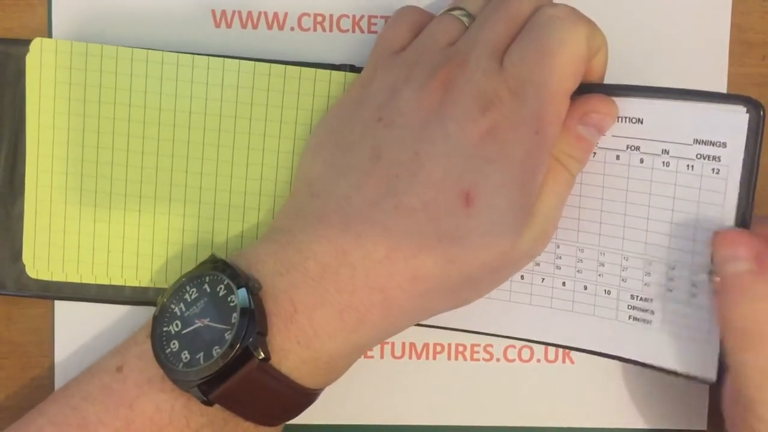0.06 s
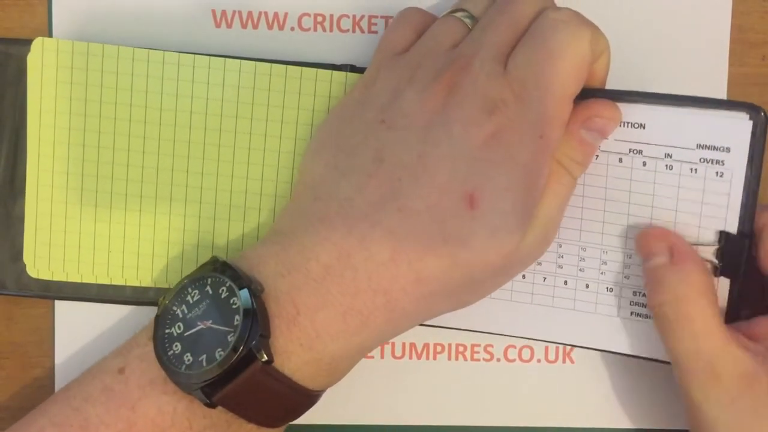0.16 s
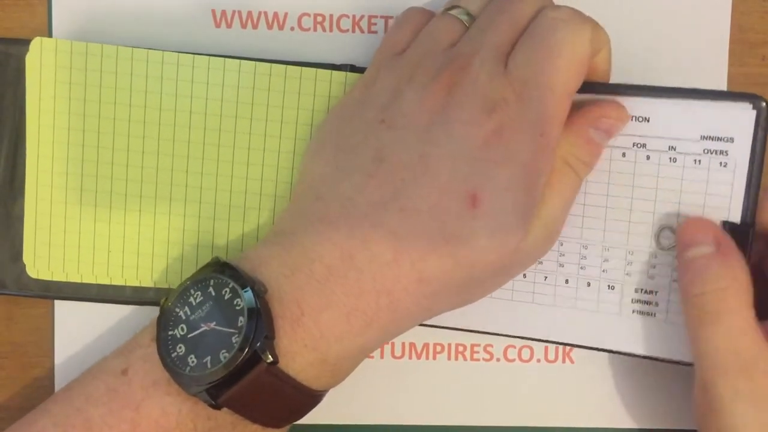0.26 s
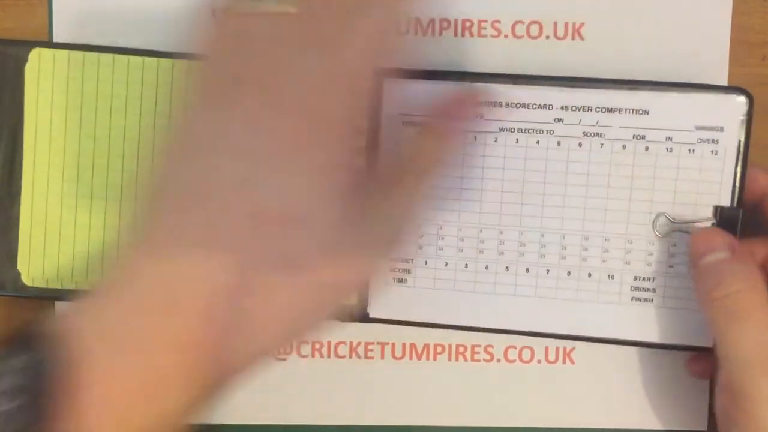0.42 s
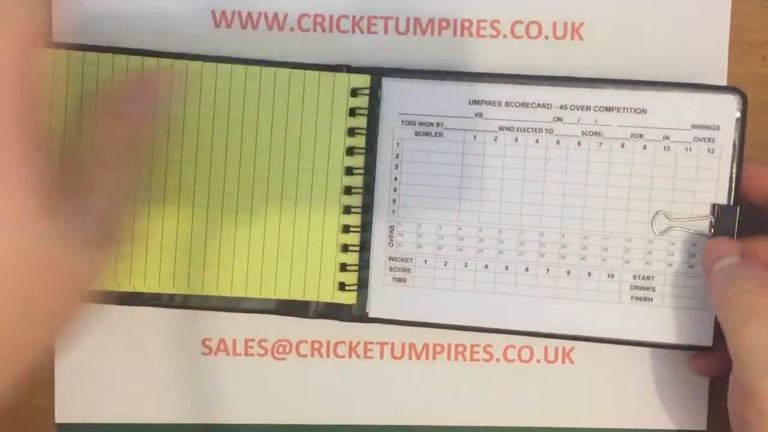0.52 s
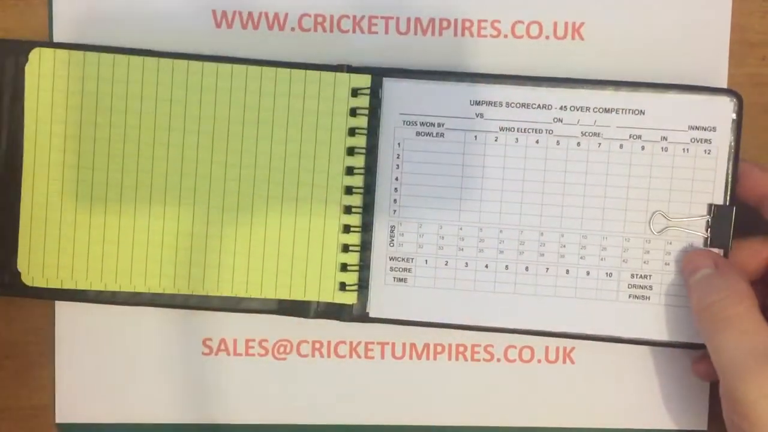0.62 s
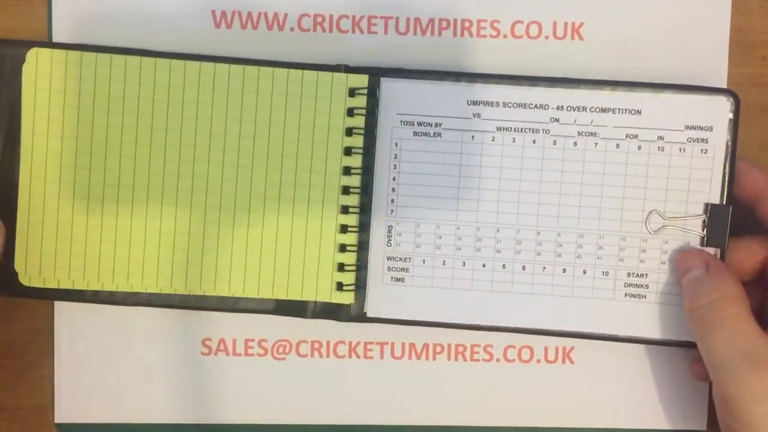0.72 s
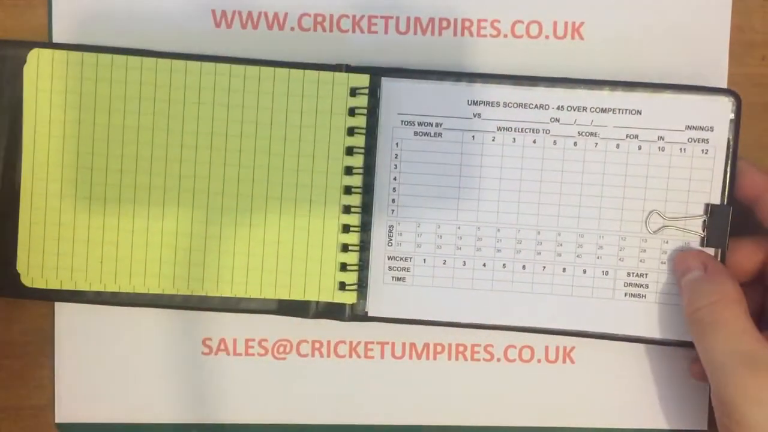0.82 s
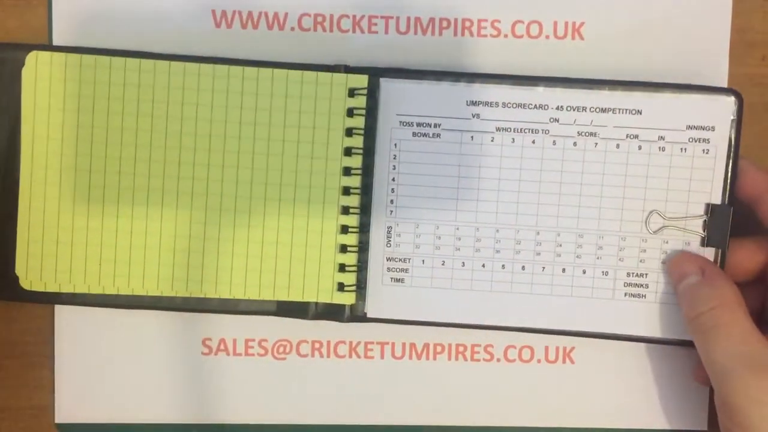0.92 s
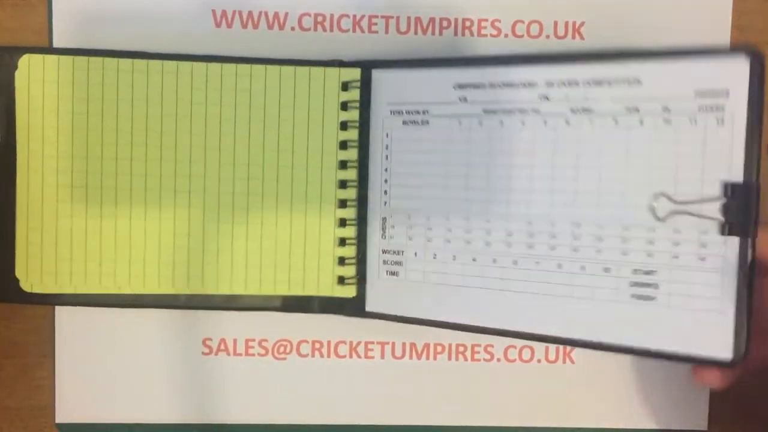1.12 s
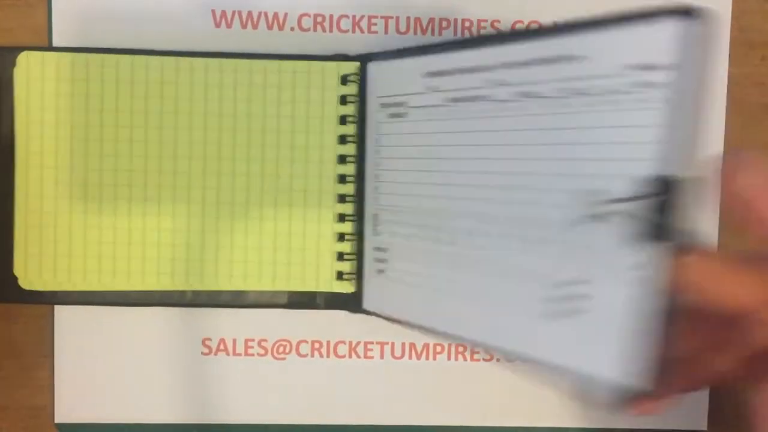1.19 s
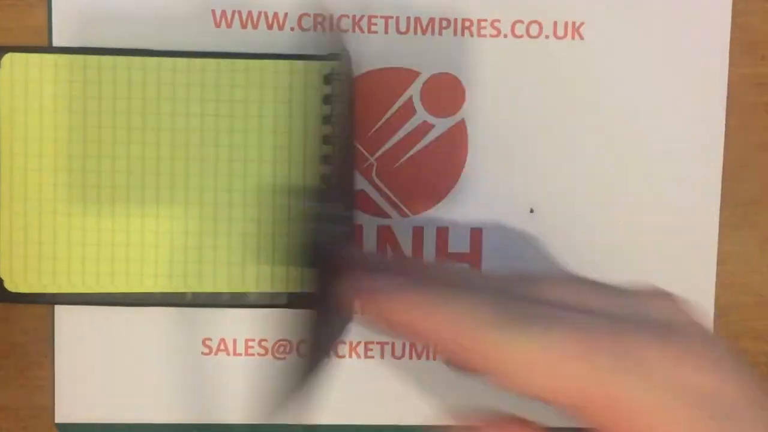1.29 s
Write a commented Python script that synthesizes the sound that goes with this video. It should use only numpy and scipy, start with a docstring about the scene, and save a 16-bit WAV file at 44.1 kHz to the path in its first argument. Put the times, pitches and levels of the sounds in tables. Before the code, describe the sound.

A small steel binder clip snaps shut sharply on a notebook cover, then faint handling taps

```python
"""A small room, the microphone close to a notebook: a small steel binder clip skids and snaps shut on its cover.
The steel jaws and the board ring as decaying sines with a crack of noise; the wire handles buzz and tick.
Taps add short notes and noise, the cover bumps on the table in low swings, and hands and pages rustle
as shaped noise and grains. Room air and a faint, wavering hum lie under it all."""
import sys
import numpy as np
from scipy import signal
from scipy.fft import rfft, irfft
from scipy.io import wavfile

SR = 44100
rng = np.random.default_rng(int(sys.argv[2]) if len(sys.argv) > 2 else 0)


def unload_wav(signal):
    """Save mono or channel-first audio to the path in sys.argv[1] as 16-bit WAV at rate SR, clipped to [-1, 1]."""
    wavfile.write(
        sys.argv[1],
        SR,
        np.round(np.clip(np.atleast_2d(signal).T, -1, 1) * 32767).astype(np.int16),
    )


N = 59535
TOP_HZ = 15700  # upper limit of the room tail and of the microphone

# jaws closing on the cover: (time [s], level [dB])
SNAP_EVENTS = [(0.2090, 1.5)]
# colour of hard contact noise: (frequency [Hz], density [dB per Hz])
CONTACT_COLOUR = [(40, -10.5), (200, -11.5), (450, -10), (1000, 4.5), (2000, -1), (3800, 1.5), (6000, -3.5),
                  (12000, -2.5), (16000, -9.5)]


def undb(db):
    """Decibels to gain."""
    return 10 ** (np.asarray(db) / 20)


def unit(x):
    """Scale to rms 1."""
    return x / np.sqrt(np.mean(x ** 2))


def age(start):
    """Seconds since start, zero before it."""
    return np.maximum(np.arange(N) / SR - start, 0)


def fade(t, t60):
    """Sudden onset, then exponential decay by 60 dB in t60 seconds."""
    return (t > 0) * np.exp(-np.log(1000) * t / t60)


def curve(rows):
    """Gain along (time [s], level [dB]) points."""
    return undb(np.interp(age(0), *np.array(rows).T))


def colour(x, points, tilt_db=0):
    """Shape a sound by (Hz, dB) points and a tilt per octave; rms 1."""
    octave = np.log2(np.fft.rfftfreq(N, 1 / SR) + 1)  # 1 Hz added to avoid log of zero
    hz, db = np.array(points).T
    knots = np.log2(hz)
    gain = undb(np.interp(octave, knots, db + tilt_db * knots))
    return unit(irfft(rfft(x) * gain, N))


def noise(points, tilt_db=0):
    """Coloured noise of rms 1."""
    return colour(rng.standard_normal(N), points, tilt_db)


def grains(per_s):
    """Tiny impacts at random times, of random sign and uneven size."""
    spread_db = 1.5
    hits = rng.random(N) < per_s / SR
    sign = rng.choice([-1, 1], N)
    return hits * sign * undb(spread_db * rng.standard_normal(N))


def ring(t, modes, tilt_db=0):
    """Sum of decaying sines, tilted per octave about their middle."""
    middle = np.mean([np.log2(mode[0]) for mode in modes])
    out = 0
    for hz, db, t60 in modes:
        level = undb(db + tilt_db * (np.log2(hz) - middle))
        out = out + level * fade(t, t60) * np.sin(2 * np.pi * hz * t)
    return out


def thin(x, hz):
    """Roll off the bass below hz."""
    return signal.sosfilt(signal.butter(2, hz, "high", fs=SR, output="sos"), x)


def snap():
    """The jaws skid, then slam shut: steel rings at once and the board follows."""
    # jaws skidding on the edge just before they close: (time [s], level [dB])
    skids = [(0.1859, -44), (0.1971, -42.5), (0.2010, -36), (0.2036, -14.5), (0.2068, -26.5)]
    # ring of a skid: (frequency [Hz], level [dB], t60 [s])
    skid_modes = [(3560, -5, 0.0094), (3900, -4.5, 0.0083), (7133, -5.5, 0.0042), (8750, -2, 0.004)]
    # scraping noise of a skid: (frequency [Hz], density [dB per Hz])
    scrape_colour = [(300, -21.5), (1000, -9), (2000, -7.5), (3700, -0.5), (5500, -5), (8000, -2.5),
                     (10500, -13.5), (16000, -19.5)]
    # steel jaws and the board that they hit: (frequency [Hz], level [dB], t60 [s])
    jaw_modes = [(2490, -18, 0.029), (3216, -13, 0.017), (3601, -5, 0.0084), (3932, -2.5, .012),
                 (4530, -17.5, .012), (5950, -11.5, 0.0099), (9370, -17.5, 0.0058), (9740, -18, .009),
                 (12120, -18.5, 0.015), (13530, -17, .008)]
    board_modes = [(1004, -10.5, 0.03), (1095, 5, 0.0097), (1282, -8, 0.019)]
    scrape_db, scrape_t60_s, skid_low_hz = -2.5, 0.013, 1800
    crack_db, crack_t60_s, snap_low_hz = -6, 0.011, 600
    board_rise_s = 0.0008

    out = np.zeros(N)
    for start, db in skids:
        t = age(start)
        scrape = undb(scrape_db) * fade(t, scrape_t60_s) * noise(scrape_colour)
        out += undb(db) * (thin(ring(t, skid_modes), skid_low_hz) + scrape)
    for start, db in SNAP_EVENTS:
        t = age(start)
        board = ring(t, board_modes) * (1 - np.exp(-t / board_rise_s))
        crack = undb(crack_db) * fade(t, crack_t60_s) * noise(CONTACT_COLOUR)
        out += undb(db) * (thin(ring(t, jaw_modes) + board, snap_low_hz) + crack)
    return out


def buzz():
    """The jolted handles rattle briefly against the jaws, a dense run of fading grains."""
    # colour of the rattle: (frequency [Hz], density [dB per Hz])
    rattle_colour = [(500, -17.5), (1000, -3.5), (2000, 1), (3000, 0), (4000, -3.5), (5200, 3), (7000, -2),
                     (12000, -3.5), (16000, -6)]
    below_snap_db, t60_s, impacts_per_s = -27.5, 0.11, 4100
    out = np.zeros(N)
    for start, db in SNAP_EVENTS:
        rattle = colour(grains(impacts_per_s), rattle_colour)
        out += undb(db + below_snap_db) * fade(age(start), t60_s) * rattle
    return out


def taps():
    """Clip and fingertips knock drily on the paper-covered board, whose note depends on the spot."""
    # taps on the cover: (time [s], level [dB], treble tilt [dB per octave],
    # board note [Hz], note level relative to the tap [dB], noise t60 [s])
    knocks = [(0.1212, -47.5, -10.5, 956, -5, 0.032), (0.3780, -38.5, 0.5, 1390, -8.5, 0.018),
              (0.3802, -45.5, -2, 678, 5.5, 0.032), (0.4070, -52.5, -3, 900, 4.5, 0.026),
              (0.4165, -52.5, -3, 1920, 2, 0.031), (0.4202, -39, -2, 700, -6, 0.035),
              (0.4551, -38.5, -1.5, 930, -3, 0.01)]
    # paper-covered board under a light tap: (frequency [Hz], level [dB], t60 [s])
    board_modes = [(1400, -11.5, 0.028), (1980, -10.5, .015), (3000, -12, 0.0062), (3440, -11.5, 0.013)]
    # colour of the knock noise: (frequency [Hz], density [dB per Hz])
    knock_colour = [(200, -26), (450, -18.5), (700, -7), (1100, 2), (2200, 1), (3500, -0.5), (5000, -9.5),
                    (9000, -8), (16000, -20.5)]
    note_t60_s = 0.035
    out = np.zeros(N)
    for start, db, tilt, note_hz, note_db, t60 in knocks:
        t = age(start)
        note = ring(t, [(note_hz, note_db, note_t60_s)])
        knock = fade(t, t60) * noise(knock_colour, tilt)
        out += undb(db) * (note + ring(t, board_modes, tilt) + knock)
    return out


def handles():
    """Light contacts ring the wire handles, which chatter briefly in their hinges."""
    # a handle settling softly in its hinge: (time [s], level [dB])
    pings = [(0.029, -57.5), (0.6190, -50)]
    # ring of the settling handle: (frequency [Hz], level [dB], t60 [s])
    ping_modes = [(620, -8.5, .03), (1320, -5, 0.028), (1680, -10.5, 0.033), (3370, -5.5, .022),
                  (3230, -9, .02)]
    # handles ticking: (time [s], level [dB], treble tilt [dB per octave], ring relative to the tick [dB])
    ticks = [(0.8423, -38, 0.5, 1.5), (1.0701, -52.5, -1.5, -11), (1.1520, -52, -2.5, 0)]
    # ring of the wire: (frequency [Hz], level [dB], t60 [s])
    wire_modes = [(1114, -14.5, 0.053), (1983, -6.5, 0.039), (2829, -26, .015), (3160, -9, 0.02),
                  (4213, -14, 0.018), (5850, -13, 0.015), (6030, -12, 0.018), (6300, -10.5, 0.011)]
    # wire chattering in its hinge: (frequency [Hz], density [dB per Hz])
    chatter_colour = [(500, -16), (1900, 3), (3200, 0), (5000, -18), (5800, -5), (6700, 5), (7500, -25),
                      (9000, 1.5), (11000, -30), (16000, -25)]
    chatter_db, chatter_t60_s, contact_t60_s = -8.5, 0.043, 0.0025

    out = np.zeros(N)
    for start, db in pings:
        out += undb(db) * ring(age(start), ping_modes)
    for start, db, tilt, ring_db in ticks:
        t = age(start)
        wire = undb(ring_db) * ring(t, wire_modes, tilt)
        chatter = undb(chatter_db) * fade(t, chatter_t60_s) * noise(chatter_colour, tilt)
        contact = fade(t, contact_t60_s) * noise(CONTACT_COLOUR, tilt)
        out += undb(db) * (wire + chatter + contact)
    return out


def bumps():
    """Soft pushes on the table set the cover swinging briefly, with faint hollow overtones."""
    # cover on the table: (time [s], level before doubling [dB], swing frequency [Hz], t60 [s])
    pushes = [(0.083, -45.5, 117.2, 0.13), (0.15, -44, 122, 0.098), (0.206, -35.5, 52, 0.066),
              (0.207, -42, 150, .08), (0.269, -44.5, 122.5, 0.13), (0.360, -46.5, 125.6, 0.24),
              (0.4653, -33.5, 114, 0.086), (0.466, -42, 65.1, 0.097), (0.755, -39, 112, 0.086),
              (0.793, -40, 69.1, 0.066), (0.851, -41.5, 115, 0.1), (0.863, -54, 66.4, 0.19),
              (0.903, -51, 133.4, 0.16), (1.165, -53.5, 100, 0.087)]
    # overtones of the cover: (frequency [Hz], level relative to the swing [dB], t60 [s])
    overtones = [(290, -17, 0.065), (350, -19, 0.05)]
    rise_s = 0.012
    out = np.zeros(N)
    for start, db, hz, t60 in pushes:
        t = age(start)
        onset = 1 - np.exp(-(t / rise_s) ** 2)
        out += 2 * undb(db) * onset * ring(t, [(hz, 0, t60), *overtones])
    return out


def handling():
    """Skin drags dully over the pad as smooth noise; paper fibres catch in tiny grains."""
    # levels of the four movements: (time [s], level [dB])
    drag_level = [(0, -68.5), (.03, -54), (.07, -55), (.12, -58.5), (.2, -50.5), (.3, -66.5), (.37, -51),
                  (.41, -78), (.48, -49), (.52, -76), (.74, -70), (.82, -67.5), (.9, -67), (.98, -78),
                  (1.35, -72.5)]  # hand dragging over the pad
    rustle_level = [(0, -96), (.12, -76), (.17, -78.5), (.2, -46), (.33, -80), (.37, -58.5), (.41, -57.5),
                    (.43, -53.5), (.47, -57.5), (.51, -66), (.6, -79), (.75, -82)]
    grip_level = [(.72, -87), (.78, -70), (.835, -57.5), (.87, -71), (.905, -62.5), (.96, -77), (1.05, -83)]  # fingers shifting their grip on the cover
    page_level = [(1.0, -84.5), (1.18, -75), (1.25, -65), (1.3, -63.5), (1.35, -66)]  # the page lifting through the air
    # their colours: (frequency [Hz], density [dB per Hz])
    drag_colour = [(30, -17), (70, -8), (130, 3), (200, -8.5), (285, 5.5), (350, -1), (450, -20),
                   (1000, -25.5), (3000, -52)]
    paper_colour = [(200, -14.5), (500, -8), (900, 5), (1800, -4), (3500, -6.5), (6000, -10), (10000, -14),
                    (16000, -17.5)]
    grip_colour = [(300, -13.5), (800, 0), (1200, -0.5), (1650, 1.5), (2300, -3.5), (4000, -16.5),
                   (9000, -21), (16000, -27)]
    page_colour = [(300, -19), (900, -0.5), (1500, 0.5), (2500, 0.5), (4000, -11.5), (8000, -15),
                   (16000, -24)]
    grains_per_s = 3900

    out = curve(drag_level) * noise(drag_colour)
    rubs = [(rustle_level, paper_colour), (grip_level, grip_colour), (page_level, page_colour)]
    for level, tone in rubs:
        out += curve(level) * colour(grains(grains_per_s), tone)
    return out


def room(x):
    """Reflections from the table and a near wall, and a short diffuse tail of decaying noise bands."""
    # tail: (low edge [Hz], level before band filtering [dB], t60 [s]); each band ends where the next begins
    bands = [(100, -11.5, 0.16), (750, -16, 0.11), (1200.4, -11, 0.15), (1700, -13.5, 0.18),
             (3050, -19, .18), (4130, -16.5, .18), (10500, -17.5, .15)]
    # table and near wall: (delay [s], level [dB])
    reflections = [(0.0109, -22), (0.014, -24)]
    tail_delay_s, tail_rise_s = 0.0013, 0.004

    t = age(tail_delay_s)
    response = np.zeros(N)
    edges = [row[0] for row in bands] + [TOP_HZ]
    for (low, db, t60), high in zip(bands, edges[1:]):
        shape = fade(t, t60) * (1 - np.exp(-t / tail_rise_s))
        band_filter = signal.butter(3, [low, high], "band", fs=SR, output="sos")
        band = signal.sosfilt(band_filter, rng.standard_normal(N))
        response += undb(db) * band * shape / np.sqrt(np.sum(shape ** 2))
    for delay, db in reflections:
        response[int(delay * SR)] += undb(db)
    return x + signal.fftconvolve(x, response)[:N]


def background():
    """Room air as coloured noise, and a hum of narrow noise bands that waver."""
    # hum: (frequency [Hz], level [dB])
    hum_lines = [(130, -79.5), (286, -79.5), (565, -79.5), (620, -76.5), (657, -73.5), (845, -71.5),
                 (1620, -79.5)]
    # room air: (frequency [Hz], density [dB per Hz])
    air_colour = [(20, -18.5), (35, -10.5), (65, -0.5), (120, 2), (180, -3), (300, -8.5), (450, -13),
                  (650, -5.5), (1000, -9.5), (1700, -12.5), (3000, -16), (6000, -22.5), (12000, -28.5),
                  (16000, -30)]
    air_db, half_width_hz = -64.5, 5.9
    f = np.fft.rfftfreq(N, 1 / SR)
    hum = np.zeros(N)
    for hz, db in hum_lines:
        peak = 1 / (1 + ((f - hz) / half_width_hz) ** 2)
        hum += undb(db) * unit(irfft(rfft(rng.standard_normal(N)) * peak, N))
    return hum + undb(air_db) * noise(air_colour)


def scene():
    """Clip, notebook and hands in the room; cover bumps and background bypass the reflections."""
    close_sounds = snap() + buzz() + taps() + handles() + handling()
    return (room(close_sounds) + bumps() + background())[None]


def record(dry):
    """The snap overloads the microphone, which bends peaks softly; the top is cut steeply."""
    top_cut = signal.ellip(10, .2, 70, TOP_HZ, fs=SR, output="sos")
    return signal.sosfilt(top_cut, np.tanh(dry))


dry = scene()
out = record(dry)
unload_wav(out)
```